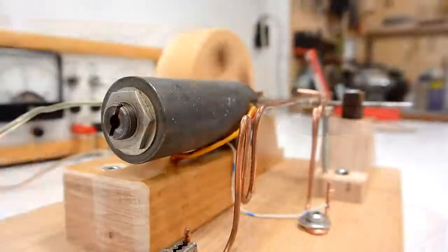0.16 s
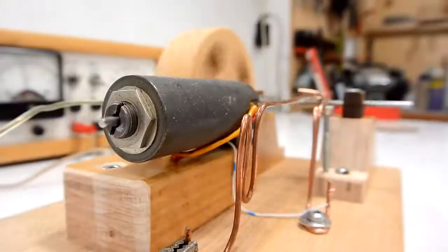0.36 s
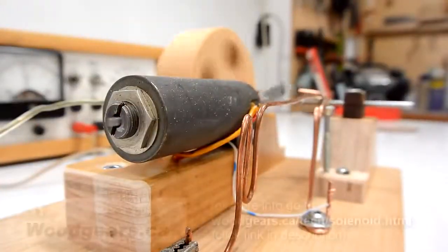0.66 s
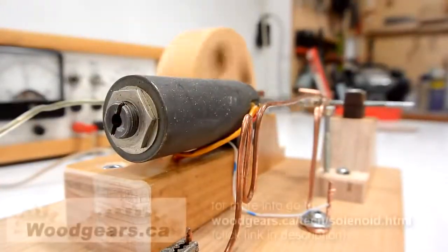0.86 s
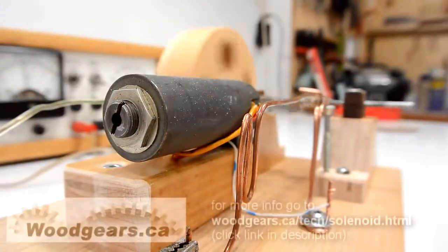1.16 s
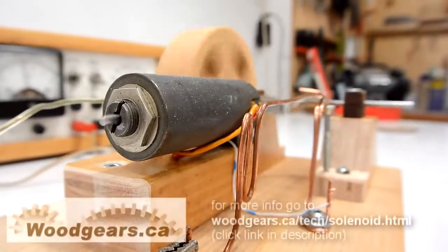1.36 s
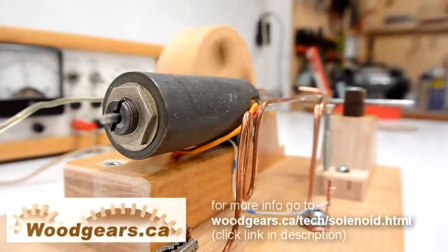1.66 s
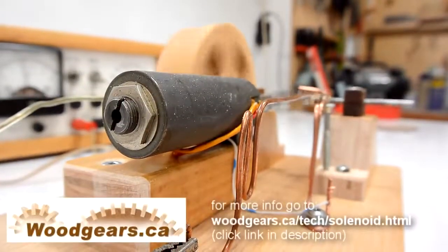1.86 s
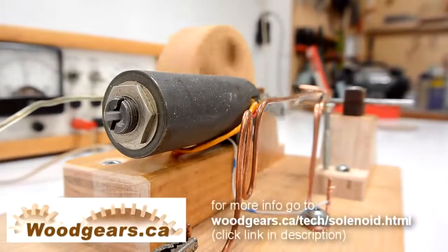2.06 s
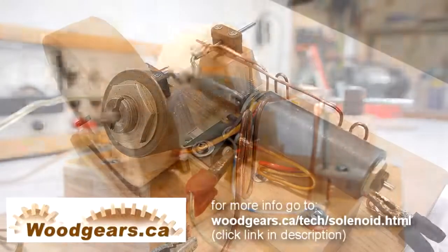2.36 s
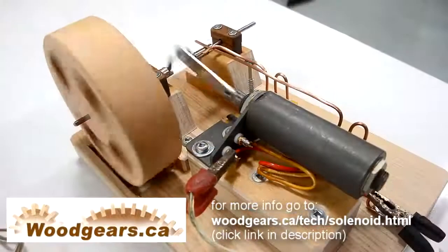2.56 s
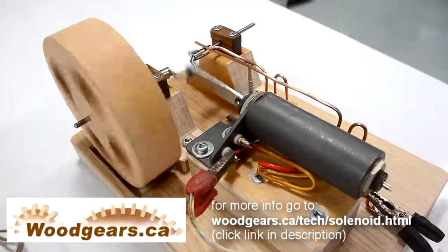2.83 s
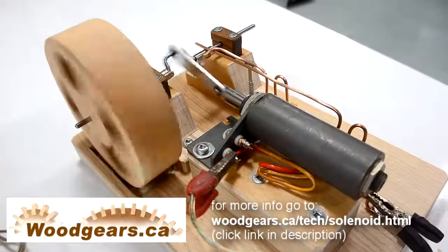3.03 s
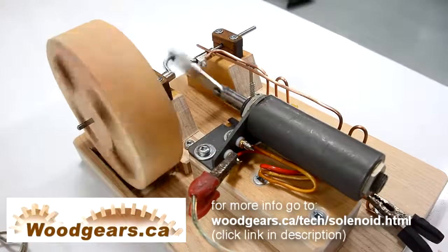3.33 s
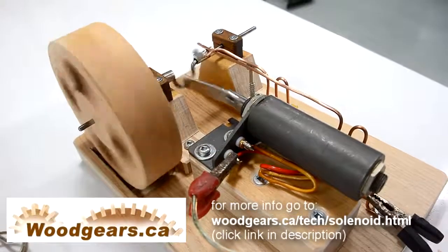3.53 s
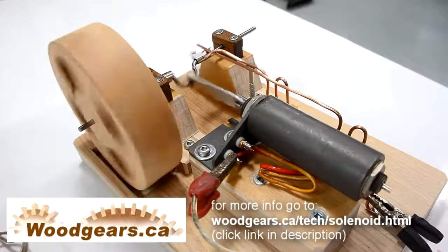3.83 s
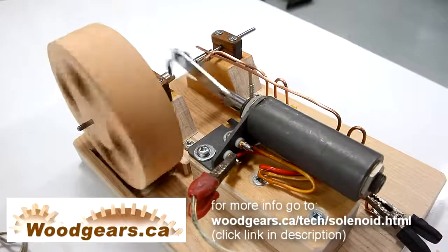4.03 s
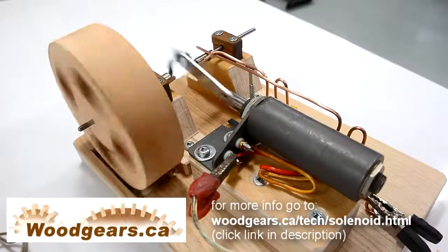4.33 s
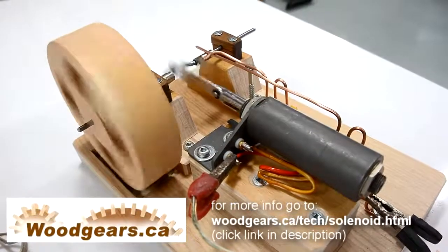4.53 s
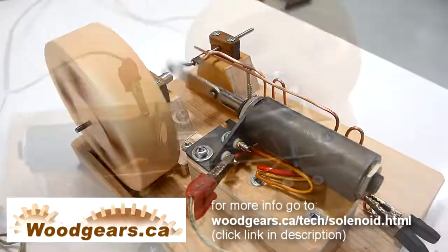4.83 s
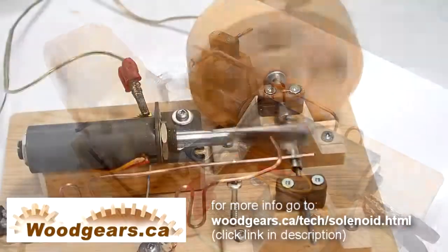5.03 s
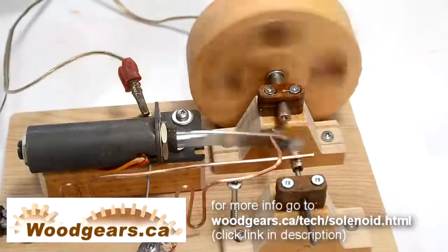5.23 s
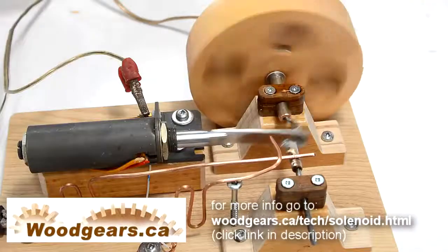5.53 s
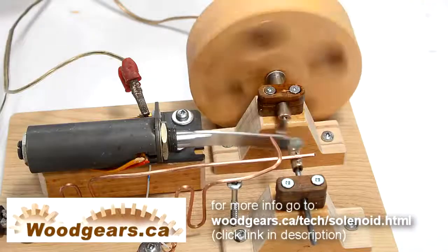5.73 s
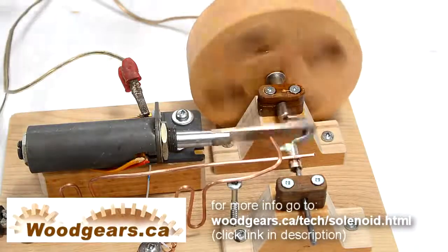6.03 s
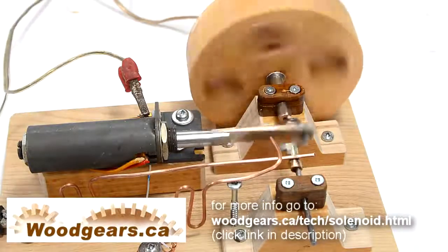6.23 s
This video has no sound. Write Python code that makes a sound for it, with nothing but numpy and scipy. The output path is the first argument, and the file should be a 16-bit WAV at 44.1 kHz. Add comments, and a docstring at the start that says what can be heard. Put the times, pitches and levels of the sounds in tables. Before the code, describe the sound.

Rapid metallic clacking from a small electric plunger engine, two uneven knocks per turn, about seven turns a second. Light ticks, high buzzing contact-wire pings and a low bearing rumble accompany it. Heard close in stereo from the side, the coil end, slightly further off and above, in a workshop. One loud switch snap comes late, followed by sparser, weaker knocks.

```python
"""On a workbench in a workshop, a small solenoid engine runs on a wooden base, close to the microphone.
Twice a turn the slack in rod and crank knocks: a rough contact force rings rod, wire, frame and base modes.
Light extra ticks sound, the contact wire pings, and plunger and bearings rub as coloured, patchy noise.
A sprung switch snaps loudly in short noise cracks, the workshop answers, and the engine coasts down.
It is heard from four places in turn: the side, the end of the coil, further off, and above."""
import sys
import numpy as np
from scipy import signal
from scipy.io import wavfile
from scipy.ndimage import uniform_filter1d

SR = 44100
rng = np.random.default_rng(int(sys.argv[2]) if len(sys.argv) > 2 else 0)


def transcribe(signal):
    """Save signal, clipped to [-1, 1], as a 16-bit WAV file at the path in sys.argv[1]."""
    frames = np.atleast_2d(signal).T
    limited = np.clip(frames, -1, 1)
    pcm = np.round(limited * 32767).astype(np.int16)
    wavfile.write(sys.argv[1], SR, pcm)


N = 281799
RING_SAMPLES = 5000  # longest single ring

# Heard places: side, end of the coil, further off, above; per-place tables have one row for each
# times when the heard place changes; the knocks of two places overlap near 2.5 and 5 s: time_s
PLACE_CHANGES_S = [.25, 2.49, 5.26]
# distance cues, interpolated: time_s, phase_spread_rad (each side, at 3 kHz), low_bass_share (0-1)
HEARD_PLACE = [(2.4, 0.52, 0.6), (2.6, 0.36, 0.52), (5, 0.28, 0.88), (5.25, 0.13, 0.27)]
# likeness of the two sides: pitch_hz, likeness (0-1)
SAME = [(60, 0.97), (340, 0.97), (900, 0.83), (1880, 0.33), (10500, 0.083)]
# treble above 9 kHz: a dip near 9900 Hz, a thin band near 10900 Hz, faint above: pitch_hz, level_db
TREBLE_COLOUR = [(9000, 0.5), (9500, -5), (9900, -17.5), (10900, -8.5), (11500, -26.5), (13500, -24.5),
                 (15000, -14)]
EDGE_HZ = 15800  # upper band limit

# low room tone colour: pitch_hz, relative_level_db
AIR = [(20, -19), (35, -17), (50, 5.5), (62, -6), (100, -6), (130, -4), (170, -35.5)]
AIR_DB = -71
# workshop decay: pitch_hz, t60_s
SHOP = [(150, 0.5), (1500, 0.35), (3000, 0.44), (6000, 0.33), (10000, 0.26)]
# workshop colour: pitch_hz, relative_level_db
SHOP_COLOUR = [(100, -27.5), (400, 3.5), (1200, 1.5), (3000, -10), (8000, -12.5)]
SHOP_DB = -12

# plunger and bearings rubbing, before the sliding load lifts them: time_s, scrape_db, rumble_db
RUB = [(0, -50.5, -54), (.25, -64.5, -60), (.4, -57.5, -52.5), (1.4, -60, -53.5), (2.4, -57, -53),
       (2.7, -56.5, -55.5), (5, -56.5, -56.5), (5.3, -58, -58), (5.8, -60, -58.5), (6.051, -63.5, -57),
       (6.39, -63.5, -57.5)]
# scrape colour: pitch_hz, relative_level_db (per Hz)
SCRAPE = [(240, -16.5), (400, 1), (600, -8), (760, 0), (950, -3.5), (1430, -5), (1690, -2.5), (1950, -11.5),
          (2860, -11.5), (3570, -11.5), (4880, -14.5), (5680, -14), (8320, -24.5), (9160, -26.5),
          (10500, -80.5), (13600, -83.5), (22000, -120)]
# rumble colour: pitch_hz, relative_level_db (per Hz)
RUMBLE = [(53, -46.5), (90, -21), (145, -3.5), (176, 0.5), (215, -7), (255, -8.5), (298, -7), (345, -11),
          (426, -18.5), (600, -27), (780, -54.5), (1320, -120)]
GRIT_PER_S, GRIT_SPREAD_DB, GRIT_DB = 1500, 3.5, -8  # GRIT_DB is relative to the hiss

# rod modes, before luck and the share of ring time: pitch_hz, relative_level_db, t60_s
ROD = [(2330, -19.5, 0.023), (2600, -35.5, 0.039), (2779, 5, 0.029), (2960, 10, 0.019), (3173, 13, 0.013),
       (3550, 14, 0.013), (3847, 11.5, 0.0076), (4576, 21, 0.0086), (5000, 23.5, 0.0055)]
# contact wire modes: columns as in ROD
WIRE = [(5560, -8, 0.012), (5740, -5.5, 0.0094), (6380, -2, 0.0051), (7300, -13, 0.002),
        (8100, -1.5, 0.0056), (9050, -18, .01)]
# frame modes: columns as in ROD
FRAME = [(506, -3.5, 0.071), (737, 4, 0.041), (775.4, 0, 0.049), (968, 17.5, 0.014), (1193, 11.5, 0.023),
         (1535, -3.5, 0.06), (1641, 5, 0.035), (1980, 18, 0.0063)]
# wooden base modes: columns as in ROD
BASE = [(135.4, -10.5, 0.044), (174.5, 12.5, 0.07), (297.6, 2, 0.1), (316, -9.5, 0.096),
        (317.7, -4.5, 0.22)]

# light extra ticks of rod and wire, in mid-stroke or close beside a knock: start_s, rod_db, wire_db
TICKS = [(.0168, -45, -67), (0.437, -42, -47), (0.5758, -40.5, -47), (1.132, -54, -44), (1.2894, -47, -56),
         (1.435, -41, -50), (2.0096, -38.5, -57), (2.15, -47, -59), (2.4032, -34, -42), (2.613, -45, -54),
         (2.6437, -36, -47), (3.187, -43.5, -71), (3.444, -32, -37.5), (3.831, -53, -64), (4.563, -42, -58),
         (4.8402, -40, -49), (5.1057, -48, -52), (5.231, -48, -53), (5.6096, -65, -64), (5.728, -43, -46),
         (6.005, -45, -53), (6.0175, -48, -47)]
# slack taken up as the plunger is pulled in, after the long half of the turn: start_s, rod_db, contact_s,
# rod_colour_hz, lead_in_s (before the knock), lead_in_db, frame_db, base_db
PULLS = [(0.0825, -38.5, 0.00098, 3000, 0.0027, -53, -42, -41),
         (0.225, -41, 0.002, 3250, 0.0048, -49, -48, -59),
         (0.335, -56, 0.0014, 3484, 0.0093, -47, -47.5, -42),
         (0.4791, -32, 0.0022, 2760, 0.0093, -54, -43.5, -47),
         (0.6163, -37, 0.0053, 3050, 0.011, -43, -45.5, -43),
         (0.758, -38, 0.00075, 3170, 0.0088, -57, -43.5, -39.5),
         (0.906, -38, 0.001, 3050, 0.0031, -46, -41, -46),
         (1.0503, -32, 0.0003, 3070, 0.008, -63, -41.5, -47),
         (1.1956, -35, 0.00094, 3000, 0.004, -55, -44.5, -43),
         (1.341, -33, 0.003, 3100, 0.0033, -54, -42.5, -47),
         (1.4866, -33, 0.00035, 3050, 0.0047, -44, -42, -37),
         (1.6306, -31.5, 0.0023, 2780, 0.0069, -41, -41.5, -47),
         (1.773, -31.5, 0.00049, 3020, 0.0046, -50.0, -40.5, -43),
         (1.9156, -29, 0.0014, 2850, 0.0051, -49, -40.5, -41),
         (2.0571, -32.5, 0.00069, 3300, 0.0144, -53, -44, -43),
         (2.1976, -33, 0.00091, 3080, 0.002, -45, -45, -43),
         (2.3382, -28.5, 0.00081, 3020, 0.007, -44, -41.5, -38),
         (2.4759, -33.5, 0.00068, 2880, 0.0073, -50.0, -53, -39),
         (2.4989, -33, 0.0068, 2960, 0.0021, -46, -62, -61),
         (2.6568, -33, 0.00087, 3680, 0.0063, -37.5, -42.5, -32.5),
         (2.8025, -31.5, 0.0005, 3340, 0.0085, -37, -61, -38),
         (2.9521, -30, 0.001, 3140, 0.0043, -32.5, -66, -40),
         (3.0982, -28.5, 0.0043, 3180, 0.0048, -35, -64, -46.5),
         (3.245, -28.5, 0.003, 2900, 0.0068, -36, -60, -50),
         (3.391, -28, 0.0022, 3220, 0.006, -33.5, -59, -55),
         (3.5263, -40, 0.0032, 3400, 0.0053, -45, -50, -42),
         (3.673, -36, 0.0039, 3300, 0.0054, -49, -62, -46),
         (3.8162, -36.5, 0.0035, 3180, 0.0066, -51, -50, -45),
         (3.9686, -28.5, 0.0023, 2940, 0.008, -33.5, -46, -55),
         (4.111, -27.5, 0.0027, 3760, 0.0092, -35, -48.5, -43),
         (4.2583, -34.5, 0.013, 3280, 0.007, -40, -50, -44.5),
         (4.4169, -29.5, 0.0015, 3400, 0.017, -37, -62, -41),
         (4.5658, -31, 0.0063, 2660, 0.0098, -37, -62, -42),
         (4.7182, -30, 0.0098, 3140, 0.0042, -34, -47.5, -48),
         (4.872, -29.5, 0.0028, 2900, 0.011, -37.5, -63, -39),
         (5.0245, -29.5, 0.0017, 3530, 0.011, -40, -58, -48),
         (5.1688, -34.5, 0.0057, 3500, 0.0088, -44, -61, -50),
         (5.4012, -34.5, 0.0005, 3900, 0.0093, -44, -42, -39.5),
         (5.5583, -46.5, 0.0018, 2960, 0.0079, -59, -56, -43.5),
         (5.739, -39, 0.0048, 3820, 0.0025, -40, -44.5, -40),
         (6.0716, -53, 0.00069, 3030, 0.0099, -59, -61.5, -58)]
# slack taken up at the far end, after the short half of the turn: columns as in PULLS
RETURNS = [(0.1375, -27, 0.0015, 3700, 0.0098, -52, -38.5, -59),
           (0.2644, -40, 0.0033, 3030, 0.0031, -56.0, -39.5, -38.5),
           (0.4019, -33, 0.0049, 3000, 0.0061, -44, -40, -49),
           (0.5393, -35, 0.0048, 3270, 0.0069, -57, -40, -42),
           (0.679, -31.5, 0.0027, 3040, 0.018, -47, -40.5, -56),
           (0.8181, -37, 0.0056, 3120, 0.0087, -55, -43, -47),
           (0.9675, -32, 0.002, 2920, 0.0037, -65, -42.5, -54),
           (1.1152, -34.5, 0.0026, 3470, 0.011, -45, -38.5, -50),
           (1.255, -44, 0.0031, 2950, 0.012, -57.0, -46.5, -62),
           (1.4057, -33, 0.0023, 3020, 0.0079, -45, -39.5, -39.5),
           (1.5465, -34, 0.0024, 3020, 0.0079, -47, -41, -45),
           (1.6916, -36.5, 0.0048, 2800, 0.0068, -53, -42, -44),
           (1.8317, -43, 0.0026, 2930, 0.0085, -56, -45, -49),
           (1.974, -32.5, 0.005, 2870, 0.006, -40.5, -37.5, -44),
           (2.1173, -32.5, 0.0027, 3000, 0.018, -58, -38.5, -39),
           (2.2561, -31, 0.0033, 3070, 0.0065, -39, -39, -53),
           (2.3955, -33, 0.0036, 3000, 0.0082, -38, -38.5, -40),
           (2.5337, -42, 0.0054, 3060, 0.0068, -49, -47, -52),
           (2.56, -37.5, 0.0052, 3100, 0.0197, -52, -48, -37),
           (2.7072, -31.5, 0.0026, 3860, 0.0077, -41, -45, -33.5),
           (2.8579, -28.5, 0.0012, 3550, 0.0085, -34.5, -40.5, -55),
           (3.0062, -27, 0.0003, 3500, 0.0089, -39, -43, -48),
           (3.154, -36, 0.0024, 3380, 0.0082, -40, -43, -38),
           (3.3001, -28, 0.0005, 3640, 0.0083, -34.5, -43, -48),
           (3.4361, -32.5, 0.00056, 3300, 0.011, -41, -41, -44),
           (3.5903, -30, 0.00052, 3600, 0.0069, -36.5, -50, -37),
           (3.7346, -32.5, 0.0015, 3550, 0.0089, -36.5, -45, -38),
           (3.8785, -31.5, 0.00091, 4100, 0.0081, -37, -43, -38),
           (4.0217, -33.5, 0.0027, 3400, 0.0083, -41, -42.5, -37.5),
           (4.1635, -35, 0.00078, 3120, 0.0076, -38, -44.5, -41),
           (4.3144, -29.5, 0.00077, 3440, 0.0078, -39, -43.5, -35.5),
           (4.4684, -26.5, 0.0006, 3420, 0.0077, -45, -39.5, -35),
           (4.6262, -30.5, 0.0024, 3450, 0.0087, -50, -39.5, -41),
           (4.7779, -28, 0.00086, 3650, 0.0092, -48, -45.5, -40),
           (4.9262, -29.5, 0.0012, 3370, 0.0069, -43, -43, -40),
           (4.991, -33, 0.0019, 3140, 0.0085, -52, -51, -58),
           (5.075, -30.5, 0.00039, 3430, 0.0068, -40, -44, -45),
           (5.1407, -29.5, 0.0017, 3460, 0.0069, -37.5, -50, -56),
           (5.224, -41.5, 0.0021, 3700, 0.0058, -49, -51, -37),
           (5.2971, -29, 0.0018, 3380, 0.0083, -41, -46, -46),
           (5.458, -30.5, 0.0029, 3540, 0.0059, -37, -46, -48),
           (5.63, -26.5, 0.002, 3560, 0.0041, -60, -45, -52),
           (5.8003, -38, 0.0005, 3730, 0.014, -62, -49, -51),
           (5.9765, -32, 0.0012, 3500, 0.014, -55, -44.5, -59),
           (6.1755, -42.5, 0.0061, 3380, 0.0049, -51, -50.5, -60.5),
           (6.3686, -41, 0.0027, 3300, 0.0049, -68, -51, -64)]
# what a pull of USUAL_DB brings along, per place, before luck: wire_db, left_minus_right_db,
# lead_in_wire_over_rod_db, rebound_after_s, rebound_db, lead_in_slide_share (0-1)
WITH_PULL = [(-59, 12, -10, 0.008, -44, 0.14), (-42.5, -4.5, -3, 0.0066, -43.5, 0.3),
             (-51, -2.5, -8.5, 0.0045, -67, 0.7), (-41.5, -1.5, -3, 0.014, -44.5, 0.6)]
# the same for a return: columns as in WITH_PULL
WITH_RETURN = [(-39, 2.4, 11, 0.0083, -50, .1), (-46, 1.6, -2.5, 0.0086, -44, 0.18),
               (-43, -2, -3.5, 0.013, -42.5, 0.1), (-43, -0.81, -7.5, 0.013, -56.5, .1)]
# reach of a pull among the rod modes around its colour, per place: reach_hz
PULL_REACH_HZ = [700, 690, 416, 700]
# reach of a return, per place: reach_hz
RETURN_REACH_HZ = [900, 630, 990, 770]
# wire modes heard best, per place: colour_hz, reach_hz, share_of_ring_time
WIRE_HEARD = [(5900, 610, 0.57), (5700, 820, 1.23), (6120, 1600, 1.06), (6500, 5700, 0.98)]
# frame and base heard in a pull, per place: frame_colour_hz, frame_reach_hz, frame_share_of_ring_time,
# base_colour_hz, base_after_s (negative: before the blow, with the lead-in)
WOOD_PULL = [(1000, 1200, 1.4, 230, -0.000026), (1000, 1300, 1.1, 210, -.002),
             (1200, 1700, 0.87, 210, -0.013), (760, 340, 1.5, 316, 0.0125)]
# the same for a return: columns as in WOOD_PULL
WOOD_RETURN = [(1000, 1000, 0.9, 230, .001), (1150, 1300, 0.89, 227, -.002), (1200, 3400, 1.1, 228, -.004),
               (770, 290, 1.1, 190, .004)]
BASE_REACH_HZ = 120
USUAL_DB = -32
WIRE_FOLLOWS, BOUNCE_FOLLOWS = 0.86, 0.46  # dB gained for each dB of the knock
# luck settings scale a normal random draw
WIRE_LUCK_DB, PAN_LUCK_DB, BOUNCE_LUCK_DB, BOUNCE_LUCK_S, SLIDE_LUCK = -1.5, 4.5, 1.5, 0.00087, 0.11
# a brief contact rings the rod for a share of its time, a long one swings it fully
BRIEF_RING, FULL_RING_S = 0.58, 0.011

# contact wire flicking off its cam after each return: two pings for each place,
# before luck and the strength of the knock: level_db, pitch_hz
FLICK = [
    [(-58, 5800), (-52, 6200)],
    [(-50, 5800), (-52.5, 7100)],
    [(-61, 8000), (-49.5, 6200)],
    [(-67.5, 5640), (-52, 7100)],
]
# delays of the two pings, before luck: after_s
FLICK_AFTER_S = (.02, .03)

# switch catch, spring blow and rebounds, before the switch colour: start_s, level_db, decay_s, top_hz
SNAP = [(5.8267, -15, 0.0018, 9500), (5.828, -8.5, 0.0019, 8070), (5.829, -5, 0.0025, 6900),
        (5.8329, -21, 0.0033, 3020), (5.839, -20, 0.011, 2600)]
# switch colour: pitch_hz, level_db
SNAP_COLOUR = [(150, -31.5), (650, -15.5), (1100, -5.5), (2500, -1), (5000, 0.5), (8000, -3.5), (9500, -3),
               (11500, -23)]
# switch spring modes: pitch_hz, relative_level_db, t60_s
SPRING = [(1623, 0.5, .03), (1950, 4.5, .025), (2940, 5, 0.02), (3700, -9, .015), (4910, 1.5, 0.018),
          (5800, 1.5, 0.016), (6170, 3, 0.016), (8380, -6, .015)]
# switch housing modes: pitch_hz, relative_level_db, t60_s
SNAP_MODES = [(355, -2.5, 0.36), (665, -1, 0.33), (980, 6, 0.27), (1030, -5, 0.42), (1194, -7.5, 0.22),
              (1484, 3, 0.38), (1610, -7, 0.19), (1933, 1, 0.41), (2970, 1.5, 0.43), (3470, -3, .26),
              (3400, -5, 0.53), (4120, -4.5, 0.32), (4700, -5.5, 0.21)]
BLOW_S = SNAP[2][0]  # the loudest crack
SPRING_DB = -5  # relative to each crack
SNAP_BASE_DB, SNAP_SHOP_DB = -26.5, 20.5  # jolt of the base; blow sent into the workshop
SNAP_RING_DB, SNAP_BUZZ = -22, 1  # peak of the housing ring; depth of its flutter
THUMP_DB, THUMP_HZ, THUMP_T60_S = -46.5, 107, 0.13


def gain_of(db):
    """Amplitude factor of a level in dB."""
    return 10 ** (np.asarray(db) / 20)


def evened(x):
    """Scale to an RMS of one."""
    return x / np.sqrt(np.mean(x ** 2) + 1e-20)


def read(points, hz):
    """Read a table at any pitch, along a logarithmic pitch axis."""
    f, value = np.transpose(points)
    return np.interp(np.log(hz + 1), np.log(f + 1), value)


def add(mix, s, sound):
    """Lay a sound into the mix at time s, cut at the end."""
    part = mix[:, round(s * SR):][:, :sound.shape[-1]]
    part += sound[..., :part.shape[1]]


def place_at(s):
    """Row number of the heard place at time s."""
    return np.searchsorted(PLACE_CHANGES_S, s)


def spread_at(s):
    """Phase spread between the sides at time s, in radians at 3 kHz."""
    return np.interp(s, *np.transpose(HEARD_PLACE)[:2])


def shaped(x, points):
    """Causal colour: the phase is the Hilbert transform of the log gain."""
    level_db = np.maximum(read(points, abs(np.fft.fftfreq(4096, 1 / SR))), -100)
    log_gain = np.log(gain_of(level_db))
    taps = np.fft.ifft(np.exp(np.conj(signal.hilbert(log_gain)))).real[:2048]
    return signal.oaconvolve(x, taps[None], axes=1)[:, :x.shape[1]]


def hiss(patchy_db):
    """White noise with patches drifting in time and pitch, partly alike on both sides."""
    frames, hz = N // 128 + 5, np.fft.rfftfreq(512, 1 / SR)
    a, b, c, d, patches = rng.standard_normal((frames, 257, 5)).T
    patches = uniform_filter1d(patches, size=10, axis=0)  # along pitch
    patches = evened(uniform_filter1d(patches, size=5, axis=1))  # along time
    same = np.clip(read(SAME, hz), -1, 1)[:, None]
    left = a + 1j * b
    right = same * left + np.sqrt(1 - same ** 2) * (c + 1j * d)
    depth_db = patchy_db * np.clip(hz / 3000, .25, 1)[:, None]
    z = np.array([left, right]) * gain_of(depth_db * patches)
    return evened(signal.istft(z, nperseg=512, noverlap=384)[1][:, :N])


def room_tone():
    """Steady low noise of the room."""
    return gain_of(AIR_DB) * evened(shaped(hiss(patchy_db=-3.0), AIR))


def grit():
    """Tiny slips, each ringing one mode of rod or wire for a moment."""
    out, t = np.zeros((2, N)), np.arange(400) / SR
    strength = gain_of(GRIT_SPREAD_DB * np.minimum(rng.exponential(1, N), 4))
    slips = strength * (rng.random(N) < GRIT_PER_S / SR)
    which, side = rng.integers(0, len(ROD + WIRE), N), rng.uniform(0.42, 1, (2, N))
    for k, (hz, _, _) in enumerate(ROD + WIRE):
        grain = np.sin(2 * np.pi * hz * t) * (t / .0006) * np.exp(-t / 0.00026)
        out += signal.oaconvolve(side * slips * (which == k), grain[None], axes=1)[:, :N]
    return evened(out)


def rubbing():
    """Scrape, wipe and rumble as coloured noise; the sliding load peaks around each knock."""
    s, scrape_db, rumble_db = np.transpose(RUB)
    t = np.arange(N) / SR
    load = np.minimum(sum(np.exp(-((t - k[0] - .003) / 0.011) ** 2) for k in PULLS + RETURNS), 1)
    scrape = evened(shaped(hiss(patchy_db=6.0) + gain_of(GRIT_DB) * grit(), SCRAPE))
    scrape = scrape * gain_of(7.3 * load)
    # the contact wire wipes over the cam with a thin, high hiss that comes in puffs
    wipe_band = signal.butter(2, [6000, 9300], "band", fs=SR, output="sos")
    wipe = evened(signal.sosfilt(wipe_band, hiss(patchy_db=-3.5)))
    wipe = wipe * gain_of(-15.5 + 10.0 * uniform_filter1d(load, size=700))
    rumble = evened(shaped(hiss(patchy_db=1.7), RUMBLE))
    rumble_db = np.interp(t, s, rumble_db) + 7.9 * uniform_filter1d(load, size=600)
    return (scrape + wipe) * gain_of(np.interp(t, s, scrape_db)) + rumble * gain_of(rumble_db)


def ring(modes, force, db, luck, colour_hz=None, reach_hz=800, spread=0., lasts=1):
    """A contact force rings a set of decaying modes, each by its own luck; db is the crest of the ring."""
    hz, mode_db, t60 = np.transpose(modes)[:, :, None]
    t60 = lasts * t60
    luck = luck[:len(hz), None]
    t = np.arange(min(RING_SAMPLES, int(t60.max() * SR))) / SR
    share = 1 if colour_hz is None else np.exp(-((hz - colour_hz) / reach_hz) ** 2 / 2)
    swell = (1 - np.exp(-t * hz / 0.86)) ** 2  # a mode needs about a cycle to take up the blow
    fade = share * swell * gain_of(mode_db + 1.2 * luck - 60 * t / t60)
    turn = 2 * np.pi * hz * (1 + 0.014 * luck[::-1]) * t
    # each mode leaves from another spot
    lag = spread * np.minimum(hz / 3000, 1.3) * np.sign(np.roll(luck, 1))
    body = np.array([(fade * np.sin(turn + lag)).sum(0), (fade * np.sin(turn - lag)).sum(0)])
    sound = signal.fftconvolve(body, np.atleast_2d(force), axes=1)[:, :RING_SAMPLES]
    sound = np.pad(sound, ((0, 0), (0, RING_SAMPLES - sound.shape[1])))
    crest = np.sqrt(2 * uniform_filter1d(sound.mean(0) ** 2, size=60).max())
    return gain_of(db) * sound / crest


def contact(chance, seconds):
    """Force of a hard first touch, a short chatter, then a faint after-rattle, different on each side."""
    t = np.arange(chance.shape[1]) / SR
    u = t / max(seconds, 1 / SR)
    chatter = chance[0] ** 3 * u ** 0.078 * np.exp(-(2.07 * u) ** 2)
    touch = (t == 0) * np.clip(0.0024 / seconds, 0, 2) ** 2  # brief contacts are nearly a single blow
    rattle = chance[1:] * (1 - np.exp(-u ** 2)) * gain_of(-26.5 - 60 * t / 0.062)
    return touch + chatter / np.linalg.norm(chatter) + rattle


def wire_ring(s, force, db, luck):
    """The contact wire's modes, as heard from the place at time s."""
    hz, reach_hz, lasts = WIRE_HEARD[place_at(s)]
    return ring(WIRE, force, db, luck, hz, reach_hz, spread_at(s), lasts)


def tick(s, db, wire_db, slide=0., slide_s=.01):
    """A light touch that rings only rod and wire; it may slide in with a growing scuff instead."""
    chance, luck = rng.standard_normal((3, 2000)), rng.standard_normal((2, 9))
    u, slide = np.arange(2000) / SR / slide_s, np.clip(slide, 0, 1)
    scuff = chance[0] * u ** 0.64 * (u < 1)
    scuff = 2 * scuff / np.linalg.norm(scuff)
    force = (1 - slide) * contact(chance, seconds=0.0012) + slide * scuff
    rod = ring(ROD, force, db, luck[0], colour_hz=3380, spread=spread_at(s), lasts=0.75)
    return rod, wire_ring(s, force, wire_db, luck[1])


def knock(out_s, db, seconds, hz, lead_s, lead_db, frame_db, base_db, places, reach_hz, woods):
    """Lead-in tick, blow through rod, wire, frame and base, and rebound of the rod: (s, sound) pairs."""
    place, spread = place_at(out_s), spread_at(out_s)
    wire_db, pan_db, lead_wire_db, back_s, back_db, slide = places[place]
    frame_hz, frame_reach_hz, frame_lasts, base_hz, base_s = woods[place]
    force = contact(rng.standard_normal((3, 2000)), seconds)
    luck = rng.standard_normal((5, 9))
    over_db, odds = db - USUAL_DB, luck[4]

    lasts = np.clip(BRIEF_RING + seconds / FULL_RING_S, .1, 1.5)
    rod_blow = ring(ROD, force, db, luck[0], hz, reach_hz[place], spread, lasts)
    wire_db = wire_db + WIRE_FOLLOWS * over_db + WIRE_LUCK_DB * odds[1]
    steel = rod_blow + wire_ring(out_s, force, wire_db, luck[1])
    pan_db = pan_db + PAN_LUCK_DB * odds[0]
    pan = gain_of([[pan_db / 2], [-pan_db / 2]])
    frame = ring(FRAME, force.mean(0), frame_db, luck[2], frame_hz, frame_reach_hz, 0.6 * spread, frame_lasts)
    base = ring(BASE, np.hanning(70), base_db, luck[3], base_hz, BASE_REACH_HZ)

    lead_wire_db = lead_db + lead_wire_db + BOUNCE_LUCK_DB * odds[2]
    rod, wire = tick(out_s, lead_db, lead_wire_db, slide + SLIDE_LUCK * odds[3], lead_s)
    back_db = back_db + BOUNCE_FOLLOWS * over_db + BOUNCE_LUCK_DB * odds[4]
    rebound = gain_of(back_db - lead_db) * rod
    return [(out_s, pan * steel + frame), (out_s + base_s, base), (out_s - lead_s, rod + wire),
            (out_s + back_s + BOUNCE_LUCK_S * odds[5], rebound)]


def linkage():
    """Slack in rod and crank knocks twice a turn, with light extra ticks of rod and wire."""
    out = np.zeros((2, N))
    pulls = (PULLS, WITH_PULL, PULL_REACH_HZ, WOOD_PULL)
    returns = (RETURNS, WITH_RETURN, RETURN_REACH_HZ, WOOD_RETURN)
    for rows, *heard in [pulls, returns]:
        for row in rows:
            for s, sound in knock(*row, *heard):
                add(out, s, sound)
    for row in TICKS:
        add(out, row[0], sum(tick(*row)))
    return out


def room(x):
    """The workshop: sparse taps of random sign, each band dying at its own speed, other taps on each side."""
    taps = np.zeros((2, SR // 2))
    at = np.arange(200, SR // 2 - 10, 10)
    jitter, sign = rng.integers(0, 10, (2, len(at))), rng.choice([-1., 1.], (2, len(at)))
    np.put_along_axis(taps, at + jitter, sign, 1)
    hz, t, z = signal.stft(taps, SR, nperseg=128)
    alike = np.clip(read(SAME, hz) - .03, 0, 1)[:, None]  # close microphones share the longer waves
    z = np.array([z[0], alike * z[0] + np.sqrt(1 - alike ** 2) * z[1]])
    decay_db = read(SHOP_COLOUR, hz)[:, None] - 60 * t / read(SHOP, hz)[:, None]
    taps = signal.istft(z * gain_of(decay_db), SR, nperseg=128)[1]
    taps = taps / np.linalg.norm(taps[0])
    return gain_of(SHOP_DB) * signal.fftconvolve(x.mean(0)[None], taps, axes=1)[:, :N]


def flicks():
    """The contact wire flicks off its cam: thin, high, buzzing sine pings in mid-stroke."""
    out, t = np.zeros((2, N)), np.arange(600) / SR
    for row, luck in zip(RETURNS, rng.standard_normal((len(RETURNS), 2, 3))):
        for after_s, (db, hz), odds in zip(FLICK_AFTER_S, FLICK[place_at(row[0])], luck):
            ping = np.sin(2 * np.pi * hz * (1 + 0.022 * odds[0]) * t)
            ping = ping * np.minimum(t / 0.0063, 1) * gain_of(-60 * t / 0.046)
            flutter = evened(uniform_filter1d(rng.standard_normal(len(t)), size=25))
            ping = ping * (1 + 0.58 * flutter)  # it buzzes as it rings
            db = db + BOUNCE_FOLLOWS * (row[1] - USUAL_DB) + 1.0 * odds[2]
            add(out, row[0] + after_s + BOUNCE_LUCK_S * odds[1], gain_of(db) * ping[None])
    return out


def cracks():
    """Catch, spring blow and rebounds: decaying low-passed noise bursts."""
    out, t = np.zeros((2, N)), np.arange(2000) / SR
    for s, db, decay, top_hz in SNAP:
        shared, left, right = rng.standard_normal((3, 2000))
        # long waves reach both sides alike
        apart = signal.lfilter(*signal.butter(1, 2500, "high", fs=SR), [left, right])
        crack = signal.lfilter(*signal.butter(2, top_hz, fs=SR), shared + 0.28 * apart)
        crack = crack * np.exp(-t / decay)
        add(out, s, gain_of(db) * crack * np.sqrt(decay * SR) / np.linalg.norm(crack))
    return out


def spring_ring():
    """The switch spring's modes ring over each crack."""
    out, luck = np.zeros((2, N)), np.array([.1, -.1] * 5)
    for s, db, _, top_hz in SNAP:
        sound = ring(SPRING, [1.], db + SPRING_DB, luck, colour_hz=1500, reach_hz=top_hz, spread=0.42)
        add(out, s, sound)
    return out


def housing_ring():
    """The switch housing's modes decay, each fluttering in level as a buzz."""
    t = np.arange(SR // 2) / SR
    flutter = uniform_filter1d(rng.standard_normal((len(SNAP_MODES), len(t))), size=500, axis=1)
    buzz = 1 + SNAP_BUZZ * evened(flutter)
    housing = sum(b * gain_of(db - 60 * t / t60) * np.sin(2 * np.pi * hz * t)
                  for b, (hz, db, t60) in zip(buzz, SNAP_MODES))
    return gain_of(SNAP_RING_DB) * housing[None] / abs(housing).max()


def switch():
    """A sprung switch cracks and rings; the base is jolted and the workshop answers."""
    blow = np.zeros((1, N))
    blow[0, round(BLOW_S * SR)] = gain_of(SNAP_SHOP_DB)  # from afar the cracks merge into one blow
    out = shaped(cracks() + room(blow) + spring_ring(), SNAP_COLOUR)
    jolt = ring(BASE, np.hanning(60), SNAP_BASE_DB, np.ones(9), colour_hz=325, reach_hz=40.5)
    add(out, BLOW_S, jolt)
    add(out, BLOW_S, housing_ring())
    return out


def thump():
    """The bench gives under the snap: one low decaying sine."""
    out, t = np.zeros((2, N)), np.arange(RING_SAMPLES) / SR
    push = np.sin(2 * np.pi * THUMP_HZ * t) * gain_of(THUMP_DB - 60 * t / THUMP_T60_S)
    add(out, BLOW_S, push[None])
    return out


def scene():
    """Engine, switch and workshop, with bass set by the heard place, over thump and room tone."""
    hits = linkage() + flicks()
    machine = hits + room(hits) + switch() + rubbing()
    # the machine's sound below about 115 Hz is cut, and from above the base board's lowest mode is weak
    machine = signal.sosfilt(signal.butter(4, 115, "high", fs=SR, output="sos"), machine)
    low = signal.sosfiltfilt(signal.butter(4, 230, fs=SR, output="sos"), machine)
    s, _, share = np.transpose(HEARD_PLACE)
    machine -= (1 - np.interp(np.arange(N) / SR, s, share)) * low
    return machine + thump() + room_tone()


def record(dry):
    """The recorder overloads softly on the snap; then the overall treble colour and the band limit."""
    full = .95  # saturation ceiling
    loud = shaped(full * np.tanh(dry / full), TREBLE_COLOUR)
    band_limit = signal.firwin(511, EDGE_HZ, window=("kaiser", 9), fs=SR)
    return signal.oaconvolve(loud, band_limit[None], "same")


dry = scene()
out = record(dry)
transcribe(out)
```